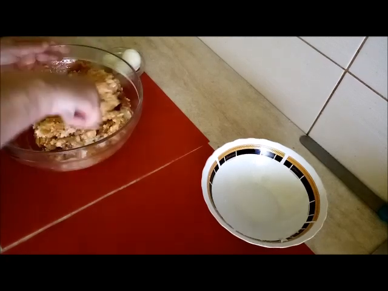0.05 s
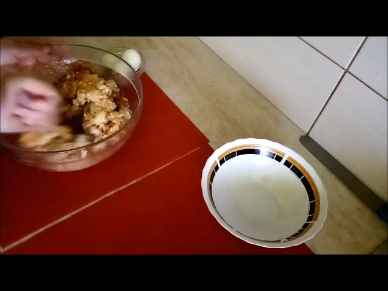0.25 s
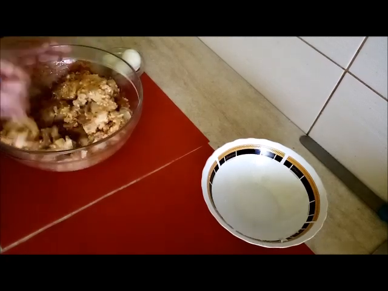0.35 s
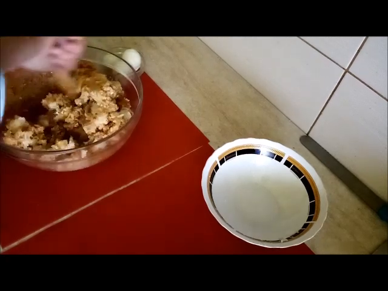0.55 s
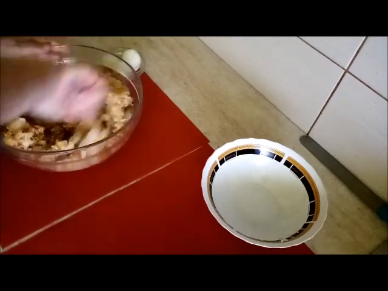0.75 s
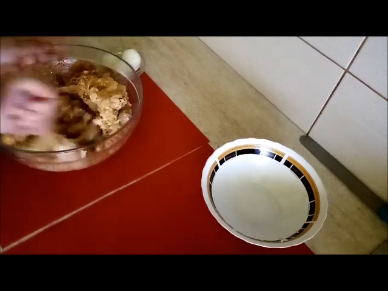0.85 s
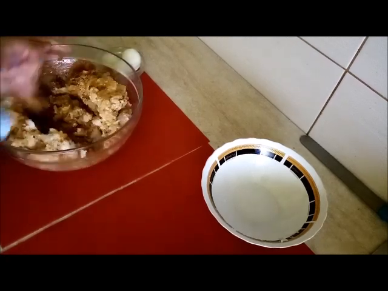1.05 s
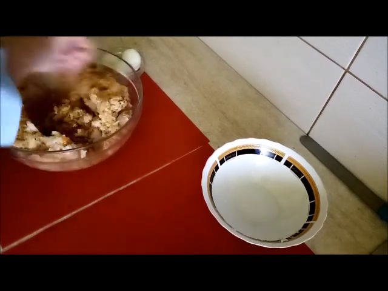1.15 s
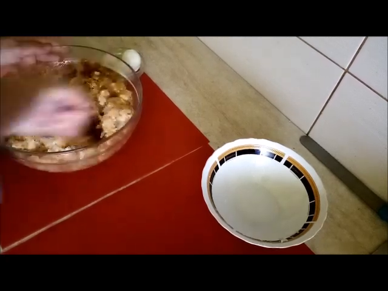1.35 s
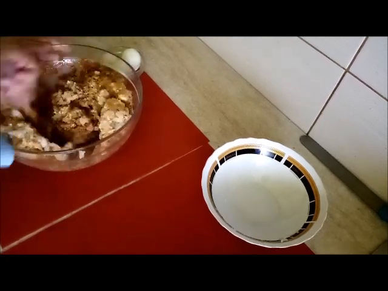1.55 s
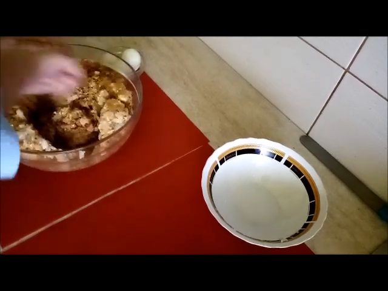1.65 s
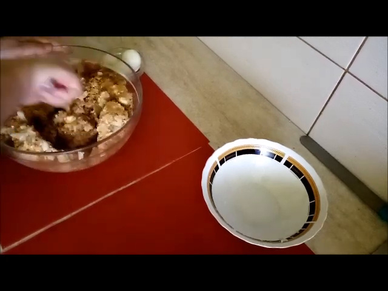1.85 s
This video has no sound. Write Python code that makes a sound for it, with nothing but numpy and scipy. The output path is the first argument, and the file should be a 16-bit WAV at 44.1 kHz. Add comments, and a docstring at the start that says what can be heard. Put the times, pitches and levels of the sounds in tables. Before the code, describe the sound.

A hand kneads a moist, sticky mixture in a glass bowl, with fine wet crackle, squelches, sharp air pops and soft dull bowl knocks on the table; close stereo microphones, left of centre, small tiled kitchen.

```python
"""Hand working a wet filling

A bare hand squeezes and turns a moist filling in a glass bowl on a kitchen table, left of the microphones.
Wet films crackle as random clicks, and the mass squelches and fizzes as swarms of short gliding tones.
Trapped air pockets pop as a ringing tone with a snap of noise, and sticky strands snap as noise bursts.
Each push knocks the bowl dully on the table: noise drives its ringing modes.
The bowl's hollow and a small tiled room ring after all but the knocks; quiet air noise lies beneath."""
import sys
import numpy as np
from scipy import signal
from scipy.fft import rfft, irfft
from scipy.io import wavfile
from scipy.ndimage import uniform_filter1d

SR = 44100
rng = np.random.default_rng(int(sys.argv[2]) if len(sys.argv) > 2 else 0)


def persist_wave(psi):
    """Save psi, clipped to +-1, as 16-bit WAV."""
    counts = np.round(np.clip(psi, -1, 1) * 32767).astype(np.int16)
    wavfile.write(sys.argv[1], SR, np.atleast_2d(counts).T)


N = 83790


def filling(count):
    """Films and bubbles sound from several places across the bowl, sharing the total power."""
    share = 1 / count
    out = 0
    for place in np.linspace(-1, 1, count):
        out = out + heard(crackle(share) + fizz(share) + squelch(share), place)
    return out


# moves of the fingers through the filling: (time [s], length [s], crackle level [dB], squelch level [dB])
FINGER_MOVES = [(-.02, 0.099, -47.5, -62.5), (0.106, 0.09, -48.5, -59.5), (0.202, 0.12, -46.5, -52.5),
                (0.316, 0.11, -42.5, -46), (0.425, 0.096, -48.5, -48), (0.5, 0.1, -49.5, -55),
                (0.619, 0.065, -42.5, -54.5), (0.695, 0.31, -46, -48), (0.952, 0.1, -42.5, -45),
                (1.046, 0.1, -48, -43), (1.128, 0.14, -46, -50.5), (1.227, 0.11, -47.5, -42.5),
                (1.35, 0.14, -52, -58), (1.484, 0.095, -42, -48), (1.579, 0.039, -45.5, -42.5),
                (1.63, 0.083, -54, -56), (1.687, 0.13, -49, -55), (1.792, 0.031, -48, -54.5)]
MOVE_ATTACK_S, MOVE_RELEASE_S = 0.0049, 0.012


def effort(column):
    """Loudness of the finger moves: each swells, holds and lets go, and overlaps add in power."""
    t = np.arange(N) / SR
    power = 0
    for start, length, *levels_db in FINGER_MOVES:
        swell = np.clip((t - start) / MOVE_ATTACK_S, 0, 1)
        release = np.exp(-np.maximum(t - start - length, 0) / MOVE_RELEASE_S)
        power = power + (undb(levels_db[column]) * swell * release) ** 2
    return np.sqrt(power)


# colour of the crackle, also given to the fizz: (frequency [Hz], level per Hz [dB])
CRACKLE_COLOUR = [(300, -31), (1500, -13), (2700, -5), (4000, -2), (5400, -2.5), (6400, 1.5), (7700, -1.5),
                  (9000, -10.5), (10500, -19.5), (13500, -31), (15400, -21)]
CRACKLE_PER_S, CRACKLE_SPREAD_DB, CRACKLE_FLICKER_DB = 6000, 4, 1.5


def crackle(share):
    """Thousands of tiny wet films burst as clicks of random size while the fingers move."""
    size = undb(CRACKLE_SPREAD_DB * np.minimum(rng.exponential(size=N), 2 * np.e))
    bursting = rng.random(N) < share * CRACKLE_PER_S / SR
    clicks = bursting * size * rng.choice([-1, 1], N)
    flicker = undb(CRACKLE_FLICKER_DB * walk(59.63))
    return np.sqrt(share) * unit(colour(clicks, CRACKLE_COLOUR)) * effort(0) * flicker


# colour of the squelch: (frequency [Hz], level per Hz [dB])
SQUELCH_COLOUR = [(100, -19.5), (350, -7), (600, -9), (780, -18.5), (1050, 1), (1600, 1), (2100, 0.5),
                  (2600, 0.5), (4000, -9.5), (9000, -24)]
SQUELCH_PER_S, SQUELCH_SPREAD_DB, SQUELCH_FLICKER_DB = 900, 3, 1.23
BUBBLE_LOW_HZ, BUBBLE_HIGH_HZ, BUBBLE_CYCLES = 458, 4430, 1.9


def squelch(share):
    """Small damped bubbles are squeezed out of the mass."""
    swarm = bubbles(share * SQUELCH_PER_S, BUBBLE_LOW_HZ, BUBBLE_HIGH_HZ, BUBBLE_CYCLES, SQUELCH_SPREAD_DB)
    flicker = undb(SQUELCH_FLICKER_DB * walk(40.63))
    return np.sqrt(share) * unit(colour(swarm, SQUELCH_COLOUR)) * effort(1) * flicker


FIZZ_PER_S, FIZZ_SPREAD_DB, FIZZ_DB = 400, 4.5, -3  # level against the crackle
FIZZ_LOW_HZ, FIZZ_HIGH_HZ, FIZZ_CYCLES = 2200, 9030, 3.9


def fizz(share):
    """Pinhead bubbles ping at high pitch among the bursting films."""
    swarm = bubbles(share * FIZZ_PER_S, FIZZ_LOW_HZ, FIZZ_HIGH_HZ, FIZZ_CYCLES, FIZZ_SPREAD_DB)
    return np.sqrt(share) * undb(FIZZ_DB) * unit(colour(swarm, CRACKLE_COLOUR)) * effort(0)


BUBBLE_GLIDE = 0.11  # pitch rise as a share of the starting pitch


def bubbles(per_s, low_hz, high_hz, cycles, spread_db):
    """A swarm of damped bubbles at random times, pitches and sizes; higher ones get more gain."""
    out = np.zeros(N)
    for when, pitch, size, side in rng.random((int(per_s * N / SR), 4)):
        hz = low_hz * (high_hz / low_hz) ** pitch
        size_db = spread_db * min(-np.log(1 - size), np.pi)
        gain = undb(size_db) * np.sign(side - .5) * hz / high_hz
        add(out, when * N / SR, gain * cavity(hz, .5 / hz, cycles / hz, BUBBLE_GLIDE))
    return out


def cavity(hz, rise_s, decay_s, glide):
    """An air pocket opens, rings briefly and rises in pitch."""
    t = seconds(rise_s + 10 * decay_s)
    envelope = (1 - np.exp(-(t / rise_s) ** 2)) * np.exp(-t / decay_s)
    pitch = hz * (1 + glide * np.tanh(t / decay_s / 2))
    return envelope / envelope.max() * np.sin(2 * np.pi * np.cumsum(pitch) / SR)


# colour of a wet snap: (frequency [Hz], level per Hz [dB])
SNAP_COLOUR = [(150, -7), (700, -6.5), (2300, 6), (3600, -3), (5300, -5.5), (6200, 3.5), (7200, -7),
               (8600, -11.5), (10000, -44), (15000, -44)]
# air pockets popping:
# (time [s], starting pitch [Hz], ring level [dB], rise [s], decay [s], snap level [dB])
AIR_POCKETS = [(0.098, 527, -49.5, 0.0009, 0.0018, -45), (0.119, 480, -52, 0.00099, 0.0025, -66),
               (.2605, 1470, -36, 0.0016, 0.0016, -36), (0.3836, 580, -30.5, 0.00082, 0.0046, -34),
               (0.392, 1580, -29, 0.00061, 0.00065, -30), (0.4074, 1060, -31, 0.00064, 0.0021, -23),
               (0.4289, 1895, -18, 0.00043, 0.001, -10.5), (0.431, 2480, -9.5, 0.0004, 0.00067, -10),
               (0.434, 860, -25.5, 0.00056, .0012, -32), (0.638, 1020, -44.5, .0005, 0.0043, -35.5),
               (0.885, 1740, -31, 0.00047, 0.0017, -28), (0.953, 1590, -37, 0.0008, 0.0012, -32),
               (1.0367, 727, -15, 0.00028, 0.0012, -25), (1.0366, 1690, -17.5, 0.00035, 0.0012, -28),
               (1.038, 2870, -25, 0.00043, .0009, -22), (1.0394, 980, -19.5, 0.00063, 0.0019, -16.5),
               (1.041, 580, -31, 0.00055, 0.0024, -43), (1.0464, 1490, -21, 0.00015, 0.00069, -29),
               (1.0745, 1150, -18, 0.000076, 0.00058, -22), (1.0736, 2580, -19.5, 0.00023, 0.00047, -35),
               (1.3041, 560, -15.5, 0.0016, 0.00075, -29), (1.3048, 1050, -25.5, 0.00027, 0.00074, -21.5),
               (1.3052, 302, -28, 0.00096, 0.0043, -39), (1.4957, 575, -26.5, 0.00053, 0.0029, -29),
               (1.497, 2590, -29, 0.00077, 0.0013, -28), (1.569, 2690, -34, 0.0003, 0.00089, -39),
               (1.585, 1580, -25.5, 0.00078, 0.00079, -28), (1.585, 900, -24, 0.00024, 0.00056, -35),
               (1.612, 625, -39.5, 0.0038, 0.0076, -48), (1.681, 1620, -37, 0.0011, 0.0017, -49),
               (1.779, 2480, -43, 0.0007, 0.0019, -49)]
POP_GLIDE, SNAP_DECAY_S = 0.013, 0.00076


def pops():
    """Large air pockets break open: a wet snap and the ring of the cavity."""
    out = np.zeros(N)
    for start, hz, ring_db, rise, decay, snap_db in AIR_POCKETS:
        add(out, start, undb(ring_db) * cavity(hz, rise, decay, POP_GLIDE))
        add(out, start, undb(snap_db) * burst(SNAP_DECAY_S, SNAP_COLOUR))
    return out


# sticky strands snapping: (time [s], level [dB], centre frequency [Hz])
STRANDS = [(.008, -36, 6400), (.056, -41.5, 3530), (0.058, -54, 6860), (.0785, -30, 6700),
           (.121, -49, 7430), (0.1375, -42, 7360), (0.148, -36, 6800), (0.204, -31, 6300),
           (0.2057, -27.5, 6650), (0.3067, -31, 6900), (0.3233, -34, 6500), (0.5745, -36, 7360),
           (0.593, -36, 8550), (0.6559, -32, 6680), (.79, -40, 6600), (0.8525, -26.5, 5450),
           (1.015, -28, 6000), (1.4125, -35, 4030), (1.6724, -30, 7400), (1.703, -36, 4330),
           (1.8012, -34, 7040)]
TICK_DECAY_S, TICK_WIDTH_OCT = 0.0022, 0.31


def ticks():
    """Sticky strands let go of the fingers and the glass, each a noise burst around one pitch."""
    out, ratio = np.zeros(N), 2 ** TICK_WIDTH_OCT
    for start, db, hz in STRANDS:
        band = [(hz / 10, -24), (hz / ratio ** 2, -8), (hz, 0), (hz * ratio, -11), (hz * ratio ** 2, -38)]
        add(out, start, undb(db) * burst(TICK_DECAY_S, band))
    return out


def burst(decay_s, points):
    """A brief coloured crack of noise that starts at about rms 1 and dies away."""
    t = seconds(.03)
    envelope = np.exp(-t / decay_s)
    crack = colour(rng.standard_normal(len(t)) * envelope, points)
    return unit(crack) * np.sqrt(np.mean(envelope ** 2))


# modes of bowl and table: (frequency [Hz], relative level [dB], time to fall 60 dB [s])
TABLE_MODES = [(55, -10, 0.36), (74, -4, 0.29), (118.7, -0.5, 0.29), (132.8, 3, 0.18), (161, -7, 0.33),
               (184, -3, 0.24), (271.7, 3, 0.12), (346.4, 1.5, 0.17), (470, -11, 0.16), (670, -6, 0.31)]
# pushes of the bowl on the table: (time [s], force level [dB], decay [s])
BOWL_PUSHES = [(0.101, -59, 0.016), (.383, -40, 0.079), (0.43, -34.5, 0.029), (0.491, -44, 0.021),
               (.525, -56.5, 0.017), (.96, -47.5, 0.13), (1.038, -38.5, 0.027), (1.059, -43.5, 0.028),
               (1.304, -37, 0.034), (1.496, -39, 0.034), (1.522, -41, 0.022), (1.575, -50, 0.02),
               (1.618, -48, 0.015), (1.739, -57.5, 0.029)]
PUSH_RISE_S = 0.00043
THUD_DB, THUD_TOP_HZ = -4.5, 307  # level against the ringing modes


def bowl():
    """Each push is a noisy force on the bowl, which thuds and rings the table."""
    out, t = np.zeros(N), seconds(.4)
    ring = 0
    for hz, db, t60 in TABLE_MODES:
        ring = ring + undb(db - 60 * t / t60) * np.sin(2 * np.pi * hz * t)
    thud_band = signal.butter(2, [50, THUD_TOP_HZ], "band", fs=SR, output="sos")
    thud = signal.sosfilt(thud_band, signal.unit_impulse(len(t)))
    response = ring / np.linalg.norm(ring) + undb(THUD_DB) * thud / np.linalg.norm(thud)
    for start, db, decay in BOWL_PUSHES:
        force = undb(db) * (1 - np.exp(-t / PUSH_RISE_S)) * np.exp(-t / decay)
        knock = signal.fftconvolve(force * rng.standard_normal(len(t)), response)
        # the knock keeps the energy of its push
        add(out, start, knock * np.linalg.norm(force) / np.linalg.norm(knock))
    return out


def heard(sound, place=0):
    """A sound from the bowl with its reflections, the bowl's hollow and the room."""
    left, right = signal.fftconvolve(sound[None], kitchen(), axes=1)[:, :N]
    return microphones(left, right, place)


RIGHT_LAG_S, LAG_SPREAD_S = .00113, .0001


def microphones(left, right, place=0):
    """Sound from a place in the bowl (-1 to 1) reaches the right microphone later."""
    lag = max(round((RIGHT_LAG_S + place * LAG_SPREAD_S) * SR), 0)
    return np.array([left, np.pad(right, (lag, 0))[:N]])


# resonances of the open bowl: (frequency [Hz], gain at the peak [dB], time to fall 60 dB [s])
BOWL_HOLLOW = [(636.4, 4, 0.28), (1050, -15, 0.31), (1740, -12, 0.32), (2340, -5, 0.29)]
# reverberation time: (frequency [Hz], time to fall 60 dB [s])
ROOM_DECAY = [(100, 0.083), (600, 0.39), (2000, 0.3), (6000, 0.28), (14000, 0.28)]
# level of the reverberation: (frequency [Hz], level against the direct sound [dB])
ROOM_LOUDNESS = [(100, -9.5), (600, -3), (2000, -2.5), (6000, -3), (14000, -6)]
ROOM_ONSET_S, EARLY_DB, EARLY_S = 0.0033, -6, 0.0068  # early level is before its bass is thinned
SHARED_BELOW_HZ = 400


def kitchen():
    """Response at both microphones: direct sound, quick reflections, the bowl's hollow, then the tiled room."""
    t = seconds(.4)
    noise, early = rng.standard_normal((2, 2, len(t)))
    f = np.fft.rfftfreq(len(t), 1 / SR)
    apart = 1 - np.exp(-(f / SHARED_BELOW_HZ) ** 2)  # long waves reach both microphones alike
    left, right = rfft(noise)
    spectra = np.array([left, np.sqrt(1 - apart) * left + np.sqrt(apart) * right])

    # the tail is built from overlapping octave bands, each with its own decay
    octave = np.log2(np.clip(f, 125, 16000))
    tail = 0
    for hz in 125 * 2 ** np.arange(8):
        envelope = (1 - np.exp(-t / ROOM_ONSET_S)) * np.exp(-np.log(1000) * t / at_hz(ROOM_DECAY, hz))
        band = irfft(spectra * np.maximum(1 - abs(octave - np.log2(hz)), 0), len(t))
        tail = tail + band * envelope / np.linalg.norm(envelope) * undb(at_hz(ROOM_LOUDNESS, hz))

    envelope = t * np.exp(-2 * t / EARLY_S)
    early = irfft(rfft(early * envelope / np.linalg.norm(envelope)) * apart, len(t))
    hollow = 0
    for hz, db, t60 in BOWL_HOLLOW:
        gain = undb(db) * 2 * np.log(1000) / (t60 * SR)  # makes the resonance peak at db
        hollow = hollow + gain * np.exp(-np.log(1000) * t / t60) * np.cos(2 * np.pi * hz * t)
    return signal.unit_impulse(len(t)) + undb(EARLY_DB) * early + hollow + tail


# colour of the still kitchen air: (frequency [Hz], level per Hz [dB])
AIR_COLOUR = [(25, -31), (60, -14), (110, -1.5), (200, -4), (600, -6.5), (2000, -31), (8000, -9),
              (15000, -29)]
AIR_DB = -65


def kitchen_air():
    """Still air: steady quiet noise, separate at each microphone."""
    noises = rng.standard_normal((2, N))
    return undb(AIR_DB) * np.array([unit(colour(noise, AIR_COLOUR)) for noise in noises])


def undb(db):
    """Turn decibels into an amplitude factor."""
    return 10 ** (np.asarray(db) / 20)


def unit(x):
    """Scale to rms 1."""
    return x / np.sqrt(np.mean(x ** 2))


def at_hz(points, hz):
    """Read (frequency [Hz], value) points on a log-frequency axis."""
    f, v = np.array(points).T
    return np.interp(np.log(np.maximum(hz, 1)), np.log(f), v)


def colour(x, points):
    """Filter with the given (frequency [Hz], level [dB]) response, without sounding ahead of time."""
    size = 2048
    level = undb(at_hz(points, np.fft.rfftfreq(size, 1 / SR)))
    # folding the cepstrum gives the minimum-phase filter
    cepstrum = irfft(np.log(level), size)
    cepstrum[1:size // 2] *= 2
    cepstrum[size // 2 + 1:] = 0
    return signal.oaconvolve(x, irfft(np.exp(rfft(cepstrum)), size))[:len(x)]


def add(out, start_s, sound):
    """Mix a sound in at a time; a negative time becomes 0."""
    i = max(int(start_s * SR), 0)
    out[i:i + len(sound)] += sound[:max(len(out) - i, 0)]


def seconds(length_s):
    """Time of each sample, in seconds."""
    return np.arange(int(length_s * SR)) / SR


def walk(rate):
    """Random levels, a new one every 1 / rate seconds, smoothed into slopes and scaled to about rms 1."""
    k = int(SR / rate)
    steps = np.repeat(rng.standard_normal(N // k + 1), k)
    return unit(uniform_filter1d(steps, k)[:N])


def scene():
    """Filling, pops and strands in the room, the bowl's knocks heard directly, and the air."""
    knocks = bowl()
    return filling(count=4) + heard(pops() + ticks()) + microphones(knocks, knocks) + kitchen_air()


# right microphone against the left: (frequency [Hz], level [dB])
RIGHT_COLOUR = [(60, -13), (140, -1), (270, -8.5), (550, -10), (1100, -10), (2200, -10.5), (4200, -8),
                (6500, -4), (8000, 1), (11000, 5.5), (15000, 9)]
TOP_HZ = 15800


def record(dry):
    """The right microphone has its own colour; the deepest bass and the top are cut."""
    bass_cut = signal.butter(5, 45, "high", fs=SR, output="sos")
    top_cut = signal.ellip(8, .2, 70, TOP_HZ, fs=SR, output="sos")
    coloured = signal.sosfilt(bass_cut, [dry[0], colour(dry[1], RIGHT_COLOUR)])
    return signal.sosfilt(top_cut, coloured)


dry = scene()
out = record(dry)
persist_wave(out)
```